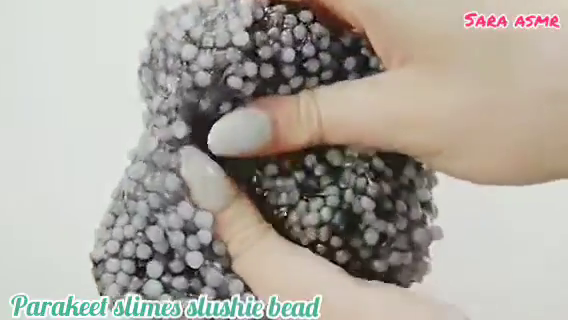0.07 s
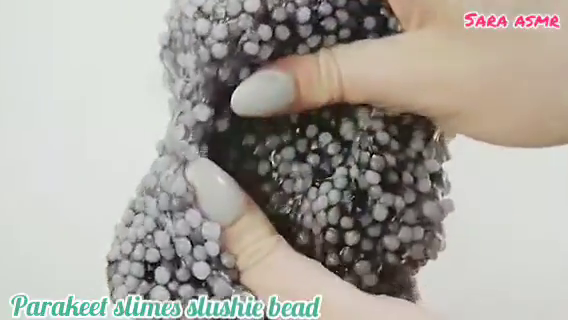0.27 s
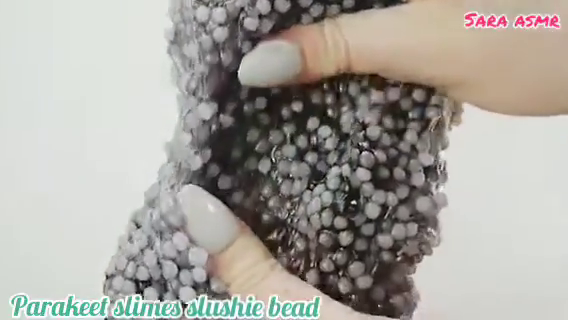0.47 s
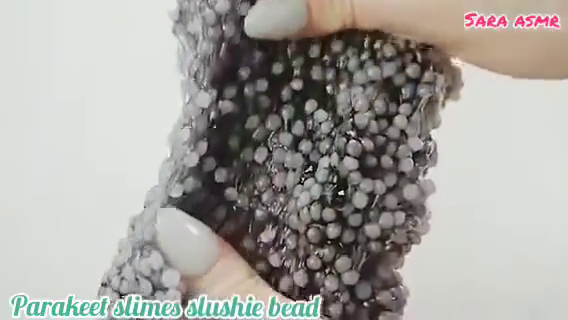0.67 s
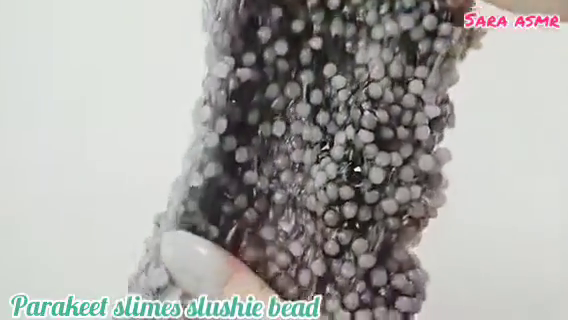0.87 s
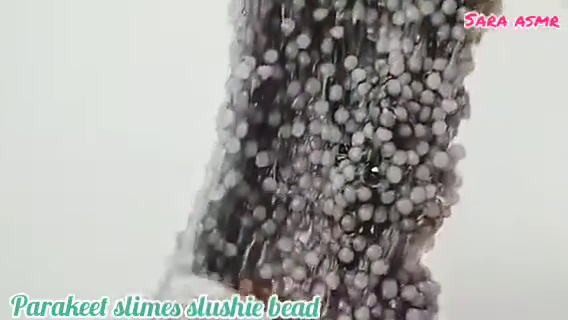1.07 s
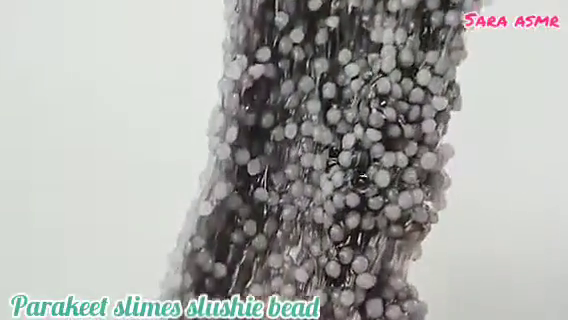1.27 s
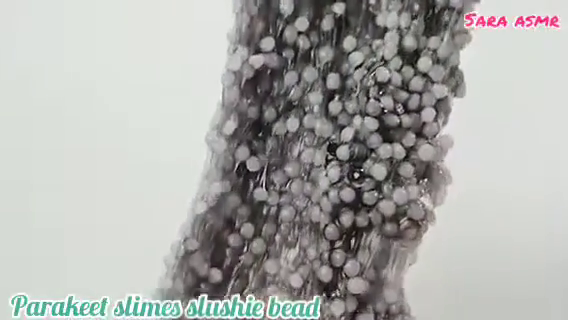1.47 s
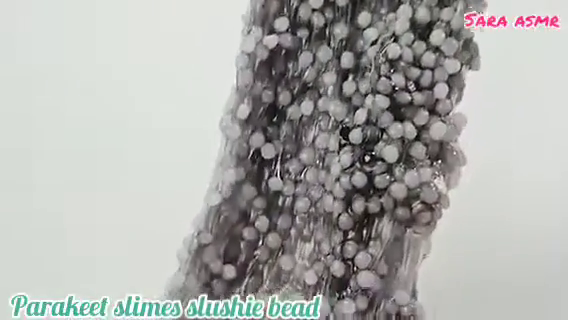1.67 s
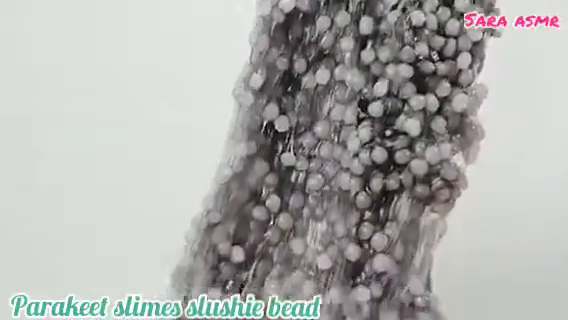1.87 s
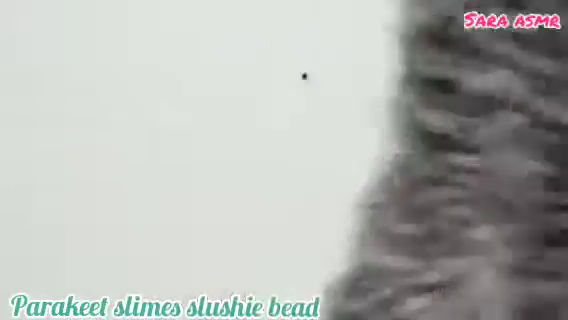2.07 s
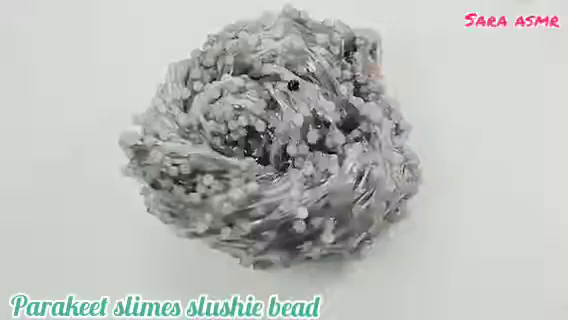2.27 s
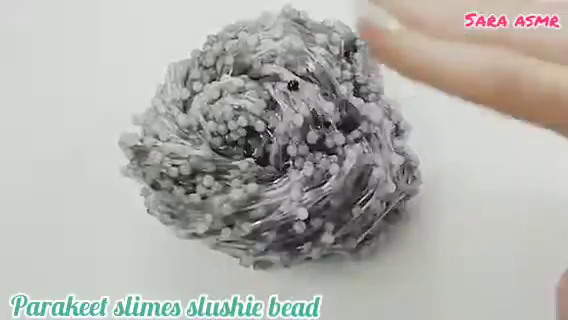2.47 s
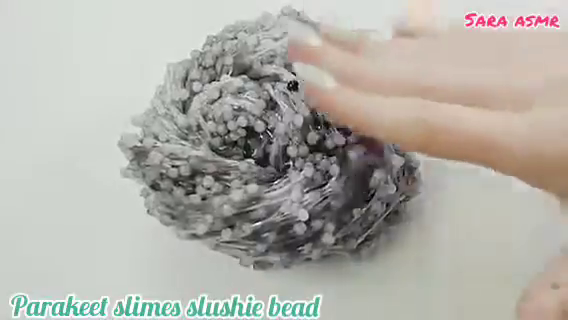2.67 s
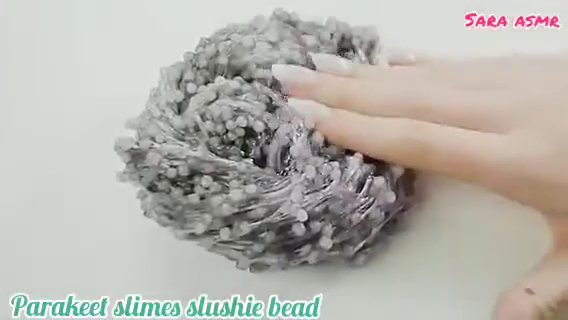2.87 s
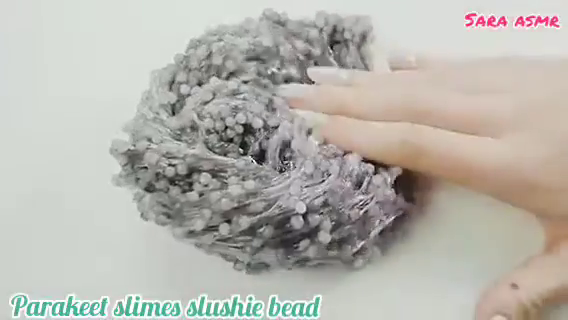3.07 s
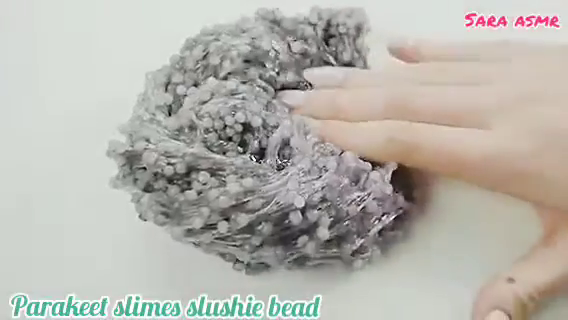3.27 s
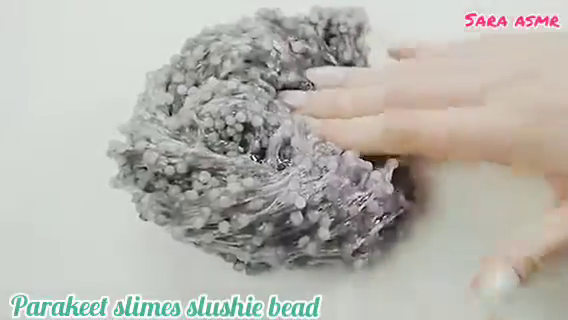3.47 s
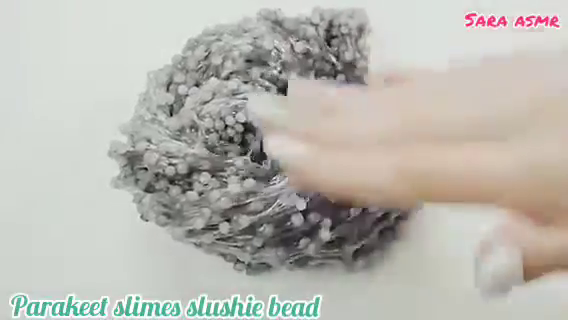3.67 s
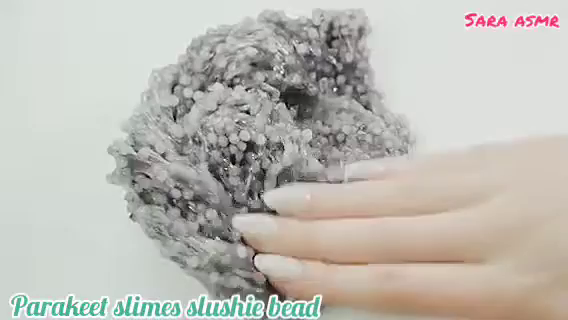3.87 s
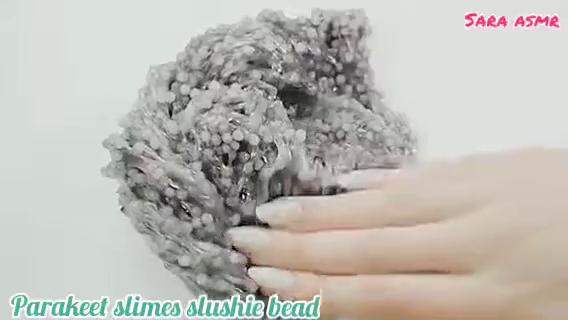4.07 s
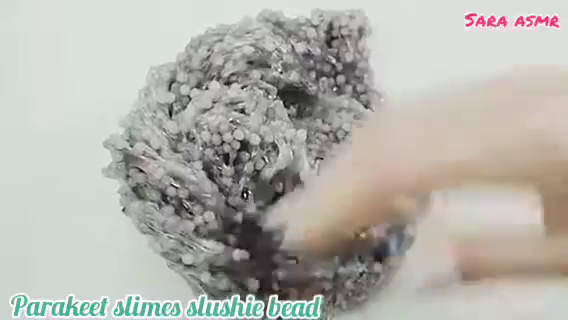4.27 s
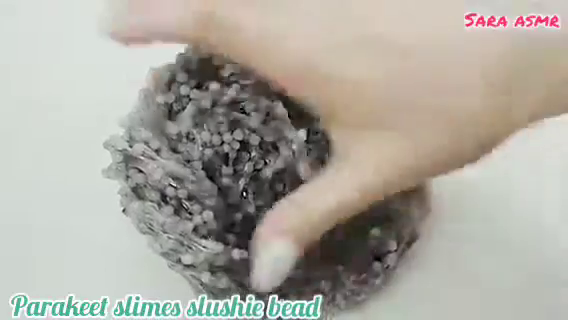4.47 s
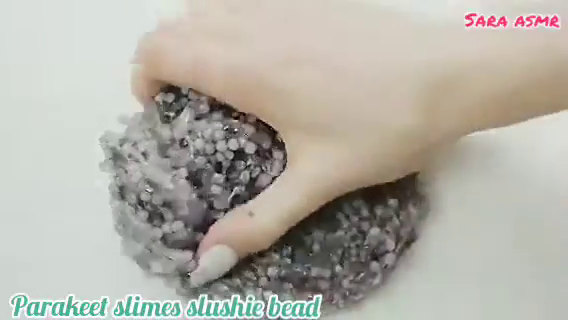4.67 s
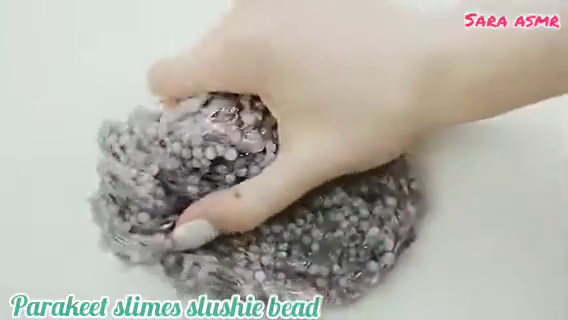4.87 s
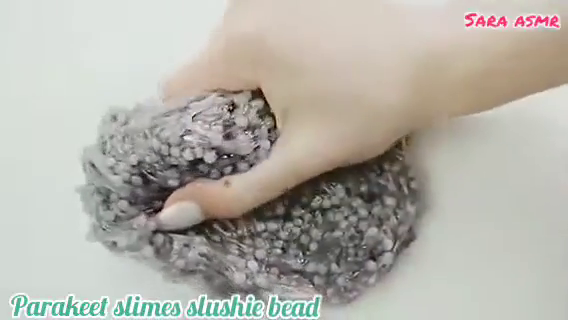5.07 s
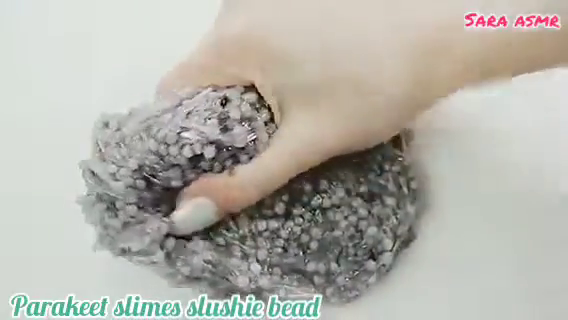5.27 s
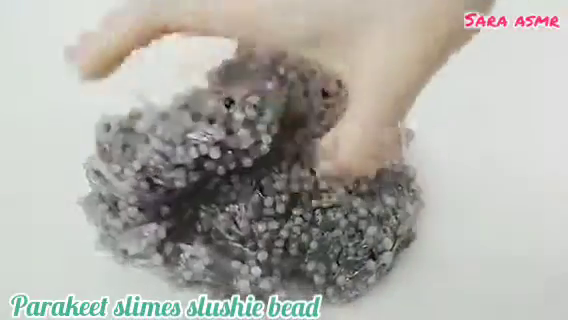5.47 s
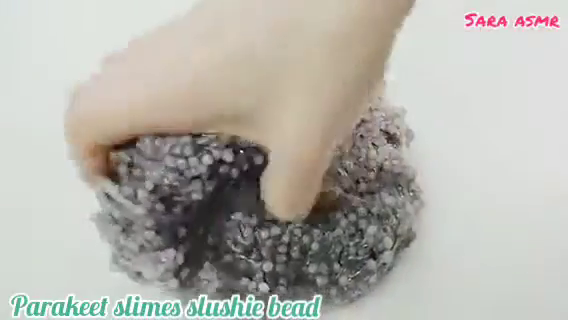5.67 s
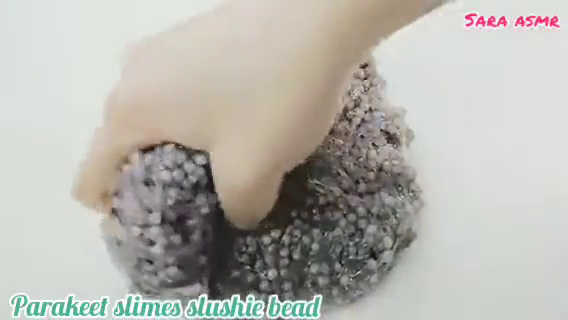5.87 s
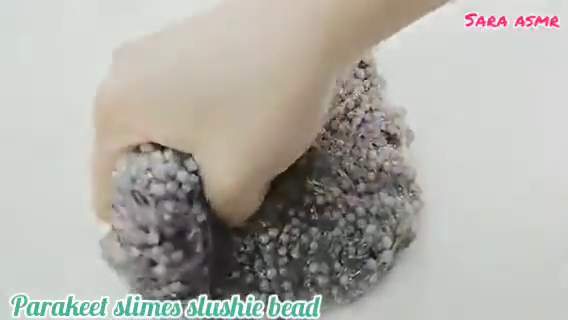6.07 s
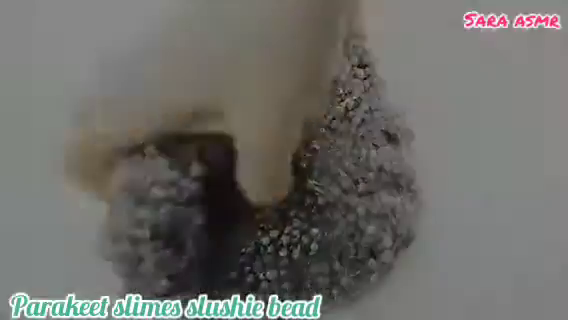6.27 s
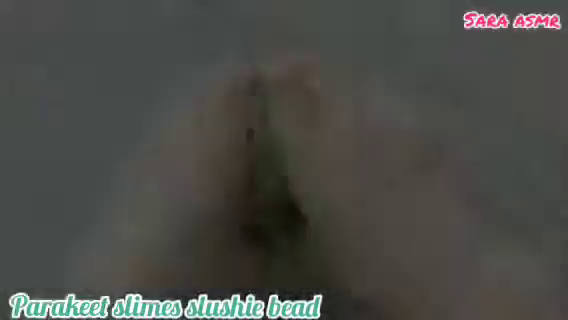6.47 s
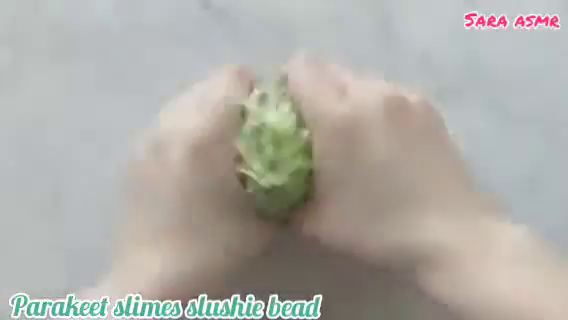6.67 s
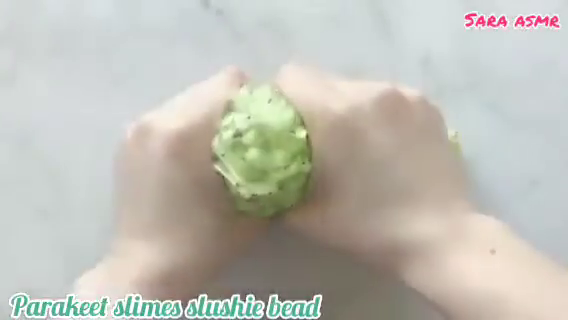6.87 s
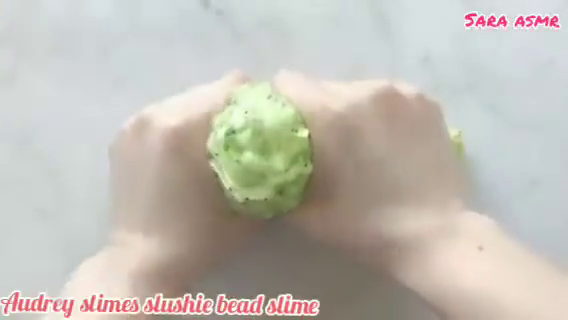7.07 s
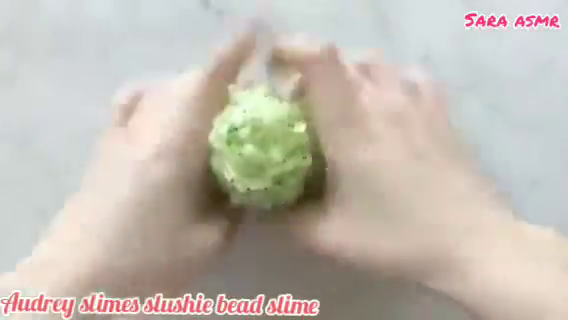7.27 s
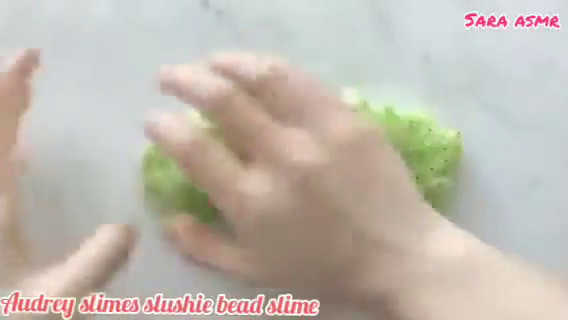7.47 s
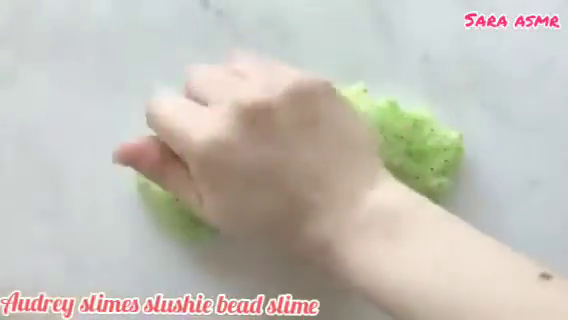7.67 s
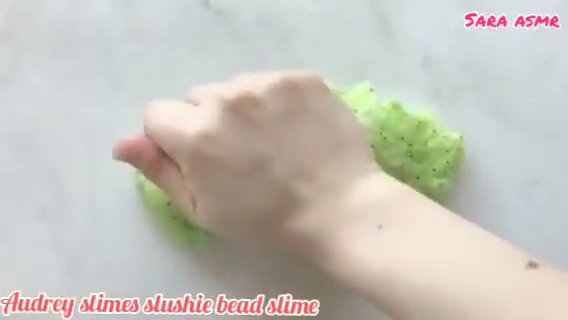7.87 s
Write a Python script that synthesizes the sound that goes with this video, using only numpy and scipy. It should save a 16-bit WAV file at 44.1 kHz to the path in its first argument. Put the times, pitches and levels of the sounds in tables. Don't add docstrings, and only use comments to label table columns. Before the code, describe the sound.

Close crackling of beady slime pulled, pressed, then crushed in fists, with snapping bubbles, low plops, a short silent gap and a late cross-fade.

```python
import sys
import numpy as np
from scipy import signal
from scipy.fft import rfft, irfft, next_fast_len
from scipy.io import wavfile
from scipy.ndimage import uniform_filter1d

SR = 44100
rng = np.random.default_rng(int(sys.argv[2]) if len(sys.argv) > 2 else 0)


def int16_out(signal):
    q = np.round(np.clip(np.atleast_2d(signal).T, -1, 1) * 32767)
    wavfile.write(sys.argv[1], SR, q.astype(np.int16))


def gain_from_decibels(decibels):
    exponent = np.asarray(decibels, float) / 20
    return 10 ** exponent


N = 349272
MONO_FROM_S = 6.42


def evened(x):
    return x / np.sqrt(np.mean(x ** 2) + 1e-20)


def read(points, hz):
    f, value = np.transpose(points)
    return np.interp(np.log(hz + 1), np.log(f + 1), value)


def coloured(x, points):
    count = next_fast_len(x.shape[-1], real=True)
    gain = gain_from_decibels(read(points, np.fft.rfftfreq(count, 1 / SR)))
    return irfft(rfft(x, count) * gain, count)[..., :x.shape[-1]]


def drift(count, smooth):
    return evened(uniform_filter1d(uniform_filter1d(rng.standard_normal(count), smooth), smooth))


def ring(t, hz, cycles):
    return np.sin(2 * np.pi * hz * t) * np.exp(-t * hz / cycles) * (1 - np.exp(-t * hz * 6))


def add(mix, s, sound):
    part = mix[max(round(s * SR), 0):][:len(sound)]
    part += sound[:len(part)]


# from t/s, to t/s, fade in/s, fade out/s
SCENES = [
    (-1, 2.25, .04, .045),
    (2.466, 6.42, .036, .6),
    (6.42, 9, .6, .04),
]
CUT_STEEPNESS = 2.5


def fader(t):
    gain = 0
    for start, end, rise_s, fall_s in SCENES:
        rise = np.clip((t - start) / rise_s, 0, 1) ** (1 if rise_s > .2 else CUT_STEEPNESS)
        fall = np.clip((end - t) / fall_s, 0, 1) ** (1 if fall_s > .2 else CUT_STEEPNESS)
        gain = gain + rise * fall
    return gain


ROOM_DB = (-59, -60.5, -55.5)
# f/Hz, level/dB per Hz
ROOM_COLOUR = [(15, -69), (25, -17.5), (120, -6), (190, -9.5), (285, -6.5), (659, -19), (14800, -39),
               (16000, -60)]


def room():
    t = np.arange(N) / SR
    mid, side = evened(coloured(rng.standard_normal((2, N)), ROOM_COLOUR))
    side = coloured(side, [(50, -13.5), (120, 0.5)]) * (t < MONO_FROM_S)
    scene_db = sum(db * ((t >= start) & (t < end)) for (start, end, _, _), db in zip(SCENES, ROOM_DB))
    level = gain_from_decibels(scene_db + .8 * drift(N, smooth=3000))
    return level * np.array([mid + side, mid - side])


# from t/s, to t/s, level/dB, f/Hz
DRONES = [
    (-0.15, 0.93, -55.5, 245.6),
    (1.802, 2.62, -52, 282),
    (5.2, 5.9, -52, 278),
    (5.44, 5.58, -54.5, 125),
]
# from t/s, to t/s, level/dB, f/Hz
BUMPS = [
    (5.65, 5.72, -51, 66),
    (5.655, 5.76, -52, 183),
    (4.612, 4.67, -50, 150),
]


def drone():
    out = np.zeros(N)
    for start, end, db, hz in DRONES + BUMPS:
        done = np.arange(0, 1, 1 / ((end - start) * SR))
        shape = [(.55 * hz, -30), (hz, 0), (1.6 * hz, -10), (4 * hz, -26), (12 * hz, -65)]
        band = evened(coloured(rng.standard_normal(SR + SR // 4), shape))[:len(done)]
        swell = gain_from_decibels(db + 2.5 * drift(len(done), smooth=1500)) * np.sin(np.pi * done ** .5)
        add(out, start, swell * band)
    return out


# peak t/s, grip level/dB, hold/s, fall/(dB/s)
PEELS = [
    (3.563, -30.5, 0.00345, 335.5),
    (4.303, -31.5, 0.0062, 299.5),
    (5.372, -31, 0.0786, 257),
    (6.33, -26.5, .004, 193.5),
    (7.255, -27.5, 0.0883, 499.5),
]


def peel_share(t):
    spans = sum((t > s - .08) & (t < s + hold_s + 30 / fall) for s, _, hold_s, fall in PEELS)
    return uniform_filter1d(spans * 1., size=900)


def gesture(t, start, length, first_db, last_db, rise, fall):
    done = np.clip((t - start) / length, 0, 1)
    edges = rise * np.maximum(start - t, 0) + fall * np.maximum(t - start - length, 0)
    return first_db + (last_db - first_db) * done - edges, done


# start t/s, length/s, grip level/dB at start, at end
PUSHES = [
    [(0, 2, -46.5, -46), (0, .28, -36, -44.5), (.31, 0.1708, -41.5, -36), (.67, 1.25, -41.5, -53.5),
     (1.05, 0.36, -42.5, -42.5), (1.57, 0.114, -44.5, -36), (1.72, 0.2567, -42.5, -37.5),
     (2.0, 0.17, -61.5, -48), (2.11, 0.0854, -47.5, -38)],
    [(2.79, 0.165, -40.5, -55.5), (2.91, 0.0886, -39, -35.5), (3.02, 0.156, -39.5, -39.5),
     (3.165, 0.0718, -39, -39.5), (3.28, 0.125, -34, -56), (3.385, 0.0297, -40.5, -44),
     (3.765, 0.1124, -48.5, -30.5), (3.88, 0.257, -33, -45.5), (3.98, 0.074, -37, -32),
     (4.1, 0.084, -38.5, -36), (4.612, 0.1558, -30.5, -23.5), (4.79, 0.1028, -25, -23.5),
     (4.92, 0.0147, -24.5, -20), (4.95, 0.0616, -33, -24.5), (5.07, 0.0948, -35.5, -25.5),
     (5.63, 0.043, -56.5, -42.5), (5.663, 0.122, -32, -25), (5.84, 0.219, -24.5, -26),
     (6.04, 0.1456, -29, -34.5)],
    [(6.43, 0.1853, -50.5, -22), (6.63, 0.441, -16, -31.5), (7.02, 0.1806, -28, -45.5),
     (7.58, 0.1693, -45.5, -21), (7.75, 0.11, -26, -27)],
]
# squelch under grip level/dB at start, at end,
# brightness/(dB/octave) at start, at end, lingering seep level/dB
DRYING = [
    (-13.5, -39.5, -0.92, -1.7, -35),
    (-11, -19.5, -1.5, -0.41, -33),
    (-14, -9.5, -1, 0.3, -55),
]
GRAB_DB_PER_S, LET_GO_DB_PER_S, LINGER_DB_PER_S = 7000, 223, 22
REST_DB, REST_BRIGHT = -88.5, 1
PEEL_RISE_DB_PER_S, PEEL_WET_DB, PEEL_BRIGHT = 261, 2.5, (-1, -1.11, -2.2)


def hands(t, k):
    wet_db, dry_db, dull, bright, linger_db = DRYING[k]
    rows = []
    for row in PUSHES[k]:
        db, done = gesture(t, *row, GRAB_DB_PER_S, LET_GO_DB_PER_S)
        rows.append((db, dull + (bright - dull) * done, db + wet_db + (dry_db - wet_db) * done))
    for s, peak_db, hold_s, fall in PEELS:
        db, _ = gesture(t, s, max(hold_s, 1 / SR), peak_db, peak_db, PEEL_RISE_DB_PER_S, fall)
        rows.append((db, PEEL_BRIGHT[k] + 0 * t, db + PEEL_WET_DB))
    fading = LINGER_DB_PER_S * t
    held_db = np.maximum.accumulate(np.max(rows, 0)[0] + fading) - fading
    seep_db = np.maximum(held_db + linger_db, REST_DB)
    rows = np.array(rows + [(seep_db, REST_BRIGHT + 0 * t, seep_db + wet_db)])
    return rows[rows[:, 0].argmax(0), :, np.arange(len(t))].T


def grains(count, per_s, spread_db, low_hz, high_hz, cycles, clump_db):
    clump = gain_from_decibels(clump_db * drift(count, smooth=120))
    size = gain_from_decibels(spread_db * np.minimum(rng.exponential(1, count), 4))
    size = size * (rng.random(count) < per_s / SR) * clump * rng.choice([-1., 1.], count)
    kind, t = rng.integers(0, 12, count), np.arange(512) / SR
    out = 0
    for k, hz in enumerate(np.geomspace(low_hz, high_hz, num=12)):
        out = out + signal.oaconvolve(size * (kind == k), evened(ring(t, hz, cycles)))[:count]
    return evened(out)


def tears(count, per_s, decay_s):
    size = gain_from_decibels(1.6 * np.minimum(rng.exponential(1, count), 3))
    starts = (rng.random(count) < per_s / SR) * size
    return .8 + signal.lfilter([1], [1, -np.exp(-1 / (decay_s * SR))], starts)


TICKS_DB = (-1.5, -2, -3)


def crackle(t, ticks_db):
    peeling = peel_share(t)
    ticks = coloured(grains(len(t), 1700, 2.2, 1000, 14000, 1.2, 1.5), [(500, -8), (15000, 4)])
    bursts = evened(tears(len(t), 360, .0028))
    fizz = rng.standard_normal(len(t)) * (peeling + (1 - peeling) * bursts)
    return gain_from_decibels(ticks_db - 6 * peeling) * evened(ticks) + fizz


def tilted(x, t, brightness):
    hz, s, z = signal.stft(x, SR, nperseg=128)
    lean = np.log2((hz[:, None] + 300) / 4000) * np.interp(s, t - t[0], brightness)
    patches = uniform_filter1d(rng.standard_normal(z.shape), size=2, axis=0)
    patches = evened(uniform_filter1d(patches, size=20, axis=1))
    return signal.istft(z * gain_from_decibels(lean + 2.6 * patches), SR, nperseg=128)[1][:len(x)]


# f/Hz, level/dB per Hz
SLIME = [
    [(290, -34.5), (500, -4), (765, -7), (1550, -2.5), (2550, 0), (7710, 0.5), (9950, 3.5), (14800, -6)],
    [(290, -24), (500, -3.5), (881, -6.5), (2660, -1.5), (6880, -2.5), (10500, -4), (14800, -12.5)],
    [(290, -17.5), (500, -9), (1530, -4.5), (3590, -4), (4310, -6.5), (7290, -4.5), (9810, -6),
     (14800, -7.5)],
]
SQUELCH_LAG_S = 0.0058


def kneading(t, k):
    coarse = t[::64]
    grip_db, brightness, squelch_db = (np.interp(t, coarse, c) for c in hands(coarse, k))
    keep = np.exp(-1 / (SQUELCH_LAG_S * SR))
    late = signal.lfilter([1 - keep], [1, -keep], gain_from_decibels(squelch_db))
    swell = np.minimum(late, gain_from_decibels(squelch_db))
    top = tilted(evened(coloured(crackle(t, TICKS_DB[k]), SLIME[k])), t, brightness)
    bubbles = (1 - peel_share(t)) * grains(len(t), 700, 3.85, 266.2, 900, 0.987, 2.5)
    wet = bubbles + gain_from_decibels(2.0) * rng.standard_normal(len(t))
    squelch = coloured(wet, [(35, -26.5), (100, -5.0), (250, -3.0), (420, 0), (800, -11.5),
                             (1500, -11.5), (4000, -48.5)])
    return fader(t) * (gain_from_decibels(grip_db - 3.0) * top + gain_from_decibels(-4.5) * swell * evened(squelch))


LEAD_S = .006


def pop(db, hz, spray_db, luck, noise):
    t = np.arange(len(noise)) / SR - LEAD_S
    after = np.maximum(t, 0)
    snap = noise * np.exp(-abs(t) / .00035)
    since = np.maximum(t + .5 / hz, 0)
    tone = ring(since / (1 + .12 * since * hz) ** .5 * 1.1, hz, .6 + 1.1 * luck)
    r = np.exp(-np.pi * .24 * hz / SR)
    poles = [1, -2 * r * np.cos(2 * np.pi * hz / SR), r * r]
    whistle = evened(signal.lfilter([1, 0, -1], poles, noise[::-1]))
    spray = np.where(t < 0, .45 * np.exp(t / .0012), np.exp(-after / .0027))
    settle = .2 * np.exp(-after / .016) * (t > 0)
    air = (spray + settle) * (gain_from_decibels(-5.5) * noise[::-1] + gain_from_decibels(-6) * whistle)
    return gain_from_decibels(db) * (gain_from_decibels(-16.0) * snap + gain_from_decibels(2.5) * tone + gain_from_decibels(spray_db - 4.5) * air)


# t/s, peak level/dB, ring f/Hz, spray level/dB
PULL_POPS = [(.0065, -25.5, 10000, -1.5), (0.0904, -19, 4720, -3.5), (0.0953, -15.5, 5180, -5),
             (0.1472, -20, 3440, -2), (0.157, -20, 5120, -3.5), (0.2435, -24.5, 4570, -5),
             (0.3114, -6.5, 10180, -11), (0.3556, -25, 5150, -0.5), (0.3851, -23, 10770, 2.5),
             (0.4201, -23, 9500, 6), (0.4284, -15.5, 1790, -25.5), (0.4313, -11, 9400, -1),
             (0.5093, -24, 10400, -10), (0.5664, -21, 9860, -8), (0.6366, -26.5, 10250, -3.5),
             (0.6852, -10, 10100, -15.5), (0.7187, -25.5, 5400, -3), (0.7559, -23, 2370, -1),
             (0.8797, -23, 2330, -10), (1.1247, -17.5, 12380, -12), (1.192, -7.5, 5330, -15.5),
             (1.2599, -23.5, 2650, -0.5), (1.2779, -19, 10600, -7.5), (1.4023, -26.5, 3070, 2.5),
             (1.4131, -19, 12730, -4), (1.5823, -25, 9600, 4.5), (1.6271, -18.5, 10400, -5.5),
             (1.668, -17, 3140, -0.5), (1.6715, -16, 7280, 0.5), (1.8185, -20.5, 9650, -7.5),
             (1.9642, -29.5, 3000, 7.5), (2.161, -28.5, 7500, -4.5),
             (0.0356, -18.5, 3370, -13), (0.0786, -27.5, 2650, -8), (0.1672, -24, 2570, -5),
              (0.169, -22.5, 9930, -12.5), (0.31, -18, 3510, -8.5), (0.3841, -26, 2580, -4),
              (0.42, -30, 9430, -12), (0.5089, -21.5, 10700, -3.5), (0.636, -29, 2580, -15),
              (0.675, -25.5, 10770, -4.5), (0.692, -28.5, 2170, -11), (0.818, -30, 4650, -4),
              (0.919, -31, 3810, -12.5), (0.918, -29, 9850, -4), (0.9598, -37, 2330, -12.5),
              (0.9757, -42, 9540, -12), (1.0467, -36, 4670, -8.5), (1.0469, -33.5, 2040, -6.5),
              (1.0684, -31.5, 10080, -12), (1.1724, -30, 11330, -9), (1.24, -23.5, 10100, -13.5),
              (1.257, -23.5, 10100, -6.5), (1.339, -27.5, 2690, -1.5), (1.097, -28, 9500, -2),
              (.859, -26, 9000, -7.5), (1.4493, -27.5, 10250, -11.5), (1.5813, -20.5, 9650, -14.5),
              (1.646, -35, 2270, 4.5), (1.721, -21, 9970, -8), (1.747, -26, 9110, -4.5),
              (1.8866, -15.5, 10640, -22), (1.9215, -23, 9990, -9), (2.0145, -29, 7060, -8),
              (2.075, -35.5, 8700, -5), (2.193, -21.5, 7280, -8.5), (2.2073, -30, 2540, -19.5)]
PRESS_KNEAD_POPS = [(2.677, -42.5, 2250, 2), (2.7909, -12, 2240, -15.5), (2.8717, -29, 2930, -9.5),
                    (2.913, -16, 10600, -15), (2.9379, -15, 2080, -8.5), (2.986, -19, 8300, -6),
                    (2.9941, -17, 2094, -2), (3.1292, -16.5, 1745, -12.5), (3.168, -19, 5650, -4),
                    (3.1977, -24, 3800, 2.5), (3.2278, -23, 1670, -9), (3.3461, -23.5, 1580, -6),
                    (3.3795, -18.5, 7220, -1.5), (3.3841, -19, 7260, -18.5), (3.864, -18, 2690, -20.5),
                    (3.8865, -16, 1380, -21), (3.895, -12.5, 4010, -14.5), (3.988, -20, 11500, -6),
                    (4.008, -14, 2240, -9), (4.052, -12.5, 10680, -38), (4.1344, -19, 2900, -22),
                    (4.1853, -10.5, 2790, -19.5),
                    (4.6345, -24.5, 2540, -7.5), (4.698, -19, 1050, -14.5), (4.96, -11.5, 5500, 2.5),
              (4.6689, -11.5, 2480, -2), (4.718, -8.5, 2660, -5), (4.728, -5, 6400, -16),
              (4.733, -16, 2510, -10.5), (4.7606, -15.5, 2580, -4.5), (4.824, -19.5, 1650, 2.5),
              (4.8808, -9, 2330, -9.5), (4.941, -8, 3670, -0.5), (4.9927, -12.5, 9100, 0.5),
              (4.9945, -24.5, 1170, 6.5), (5.1757, -21, 2040, 6.5), (5.263, -31, 4630, 1.5),
              (5.6553, -19.5, 5650, 4), (5.659, -17.5, 1253, -8), (5.6884, -14, 2650, -15.5),
              (5.7188, -8.5, 2646, -20.5), (5.768, -13, 2630, -13), (5.773, -12.5, 1620, 1),
              (5.789, -6, 12100, -16), (5.8349, -19.5, 2730, 0.5), (5.8468, -19.5, 1680, -2.5),
              (5.868, -13, 2800, -8), (5.9591, -17, 2720, 3), (5.9884, -12.5, 2480, -11.5),
              (6.0241, -12, 3020, 2.5), (6.0277, -8, 4270, -3), (6.034, -8.5, 6870, -5.5),
              (6.204, -28.5, 2630, -8),
                    (2.826, -34, 2370, -8), (2.8847, -29.5, 3040, -9), (2.8973, -34.5, 3080, -6),
               (3.0449, -25, 1510, -13.5), (3.0638, -29.5, 4630, -5.5), (3.0659, -21, 2650, -5),
               (3.091, -22, 1940, -4.5), (3.18, -23, 3700, 0), (3.2766, -17.5, 2290, -2.5),
               (3.2875, -23, 2110, -0.5), (3.38, -21.5, 2700, -4), (3.5153, -34, 6630, -16.5),
               (3.64, -45, 6140, -9), (3.7578, -54, 2410, 4), (3.7601, -34.5, 6050, -5),
               (3.9414, -21, 5900, -9.5), (4.011, -21.5, 8790, -8.5), (4.0452, -18.5, 5500, -5),
               (4.08, -22, 2580, -9.5), (4.096, -27.5, 1490, -8.5), (4.1335, -21.5, 4670, -7.5),
               (4.1607, -25.5, 4650, -9), (4.1611, -20.5, 1630, -7), (4.3921, -45, 5190, -9.5),
               (4.4334, -49, 4220, -9), (4.6141, -21, 5540, -3), (4.65, -11, 2420, -4),
               (4.773, -12, 2740, -6.5), (4.926, -15.5, 10060, -6.5), (4.9359, -9.5, 6640, -8),
               (4.9922, -22, 2730, 1.5), (5.08, -13, 10440, -7.5), (5.156, -12.5, 10570, -5),
               (5.2442, -34, 6400, -7.5), (5.7414, -13, 2430, -17), (5.835, -19.5, 5230, -16),
               (5.8359, -16.5, 1500, -18), (5.8637, -13, 5660, -12), (5.909, -13, 1664, -10),
               (5.9457, -14, 8680, -4), (5.954, -13.5, 1750, -7.5), (5.955, -16.5, 4520, -4.5),
               (6.1119, -25, 7240, -10.5), (6.1106, -34.5, 2910, -9.5), (6.131, -26, 10080, -2.5),
               (6.192, -30.5, 1590, -17.5), (6.3081, -35.5, 10270, -9)]
SQUEEZE_CRUSH_POPS = [(6.4479, -39.5, 5710, -14.5), (6.498, -38, 2520, -1.5), (6.54, -32, 2060, 5.5),
                      (6.6403, -6.5, 2350, -24.5), (6.6501, -2, 9140, -29.5), (6.68, -18, 1510, 0.5),
                      (6.7445, -13, 11620, -11), (6.7532, -11, 3600, -0.5), (6.7562, 0.5, 6350, -21.5),
                      (6.7986, 0, 8100, -10), (6.827, -14, 1180, 0), (6.8591, 7.5, 6600, -11),
                      (6.894, -2.5, 8100, -5), (6.897, 12, 13200, -19), (6.9265, -2.5, 11400, -11),
                      (6.9492, -20, 2960, 11), (6.994, -16.5, 14400, 4), (7.0504, -1, 11900, -9),
                      (7.054, -7, 13500, -11), (7.076, -10.5, 3720, -10), (7.0792, -16.5, 5660, 1.5),
                      (7.098, -25, 1500, -2),
                      (7.478, -52, 6970, -6), (7.773, -10.5, 4300, -6), (7.6828, 1.5, 10840, -10),
              (7.7032, -14.5, 1420, 5), (7.7282, -6.5, 1280, 0.5), (7.7449, -0.5, 8060, -2.5),
              (7.748, -9.5, 8350, -1), (7.7821, 2, 5540, -1), (7.787, -12.5, 5940, -5.5),
              (7.819, -21, 2820, -12), (7.8246, -17, 10360, 8), (7.827, -1, 7240, -8),
              (7.852, -0.5, 12100, -10), (7.8916, -6.5, 3435, 4),
                      (6.4743, -42, 9000, -12.5), (6.51, -35.5, 5320, -11.5), (6.523, -33, 1250, 1),
                 (6.5383, -34, 1080, 3.5), (6.558, -28.5, 1400, -1.5), (6.558, -21, 5070, -9.5),
                 (6.6474, -9.5, 2380, -15), (6.6673, -16, 7770, -16), (6.7104, -8, 8400, -10.5),
                 (6.764, 1.5, 7140, -6.5), (6.8577, 3.5, 3624, -12.5), (6.877, -9.5, 12640, -12),
                 (6.9088, -20, 1810, -6), (6.949, 3, 13450, -7), (7.038, -8.5, 12380, -7.5),
                 (7.107, -18, 9000, -1.5), (7.1503, -20, 4540, -7.5), (7.539, -42, 6250, -5.5),
                 (7.5748, -19, 5540, -12.5), (7.5783, -24, 1503, -12), (7.5904, -31.5, 5920, -11.5),
                 (7.5906, -21, 3770, -16), (7.6075, -27.5, 12340, -14.5), (7.6374, -19.5, 10570, -6),
                 (7.7097, 3, 5490, -19.5), (7.8166, 1.5, 3450, -5), (7.8175, -10, 1130, -5)]


def popping(k):
    pops = (PULL_POPS,
            PRESS_KNEAD_POPS,
            SQUEEZE_CRUSH_POPS)[k]
    out, luck = np.zeros(N), rng.random(len(pops))
    noise = evened(coloured(rng.standard_normal((len(pops), 2048)), SLIME[k]))
    for (s, *row), chance, hiss in zip(pops, luck, noise):
        add(out, s - LEAD_S, pop(*row, chance, hiss))
    return out


# f/Hz, side minus mid level/dB
WIDTH = [
    [(60, -13.5), (380, 1), (2380, -7.5), (15000, -1.5)],
    [(60, -43), (380, -7), (2380, -9), (15000, -3.5)],
    [(4000, -7), (9000, -5), (15000, -5)],
]


def spread(x, k):
    hz, _, z = signal.stft(x, SR, nperseg=128)
    phase = np.exp(2j * np.pi * rng.random(z.shape))
    turned = z * phase * gain_from_decibels(read(WIDTH[k], hz) + 1.5)[:, None]
    return signal.istft(turned, SR, nperseg=128)[1][:N]


# t/s, peak level/dB, f/Hz
CAVITIES = [(.695, -34.5, 420), (1.195, -43, 422), (2.7925, -39.5, 800), (3.29, -33.5, 409),
            (4.634, -26.5, 408), (4.8277, -26.5, 489), (4.944, -24, 486), (4.9933, -19.5, 505),
            (5.17, -25, 490), (5.8488, -23.5, 451), (6.0262, -21.5, 467.5), (6.7092, -22.5, 470),
            (6.766, -27.5, 731), (6.8278, -20.5, 425.8), (7.7038, -18.5, 697), (7.7321, -12, 632),
            (7.7475, -18, 587), (7.785, -19, 419), (7.8195, -4.5, 473.6), (7.8934, -15, 679)]


def plops():
    out, t = np.zeros(N), np.arange(1500) / SR
    for s, db, hz in CAVITIES:
        turns = hz * (0.746 * t + 0.001098 * (1 - np.exp(-t / 0.00157)))
        envelope = np.exp(-t / 0.001493) * (1 - np.exp(-t / 0.000892))
        add(out, s - .002, gain_from_decibels(db + 5.0) * np.sin(2 * np.pi * turns) * envelope)
    return coloured(out, [(60, -28.5), (200, 3.0)])


# f/Hz, width/Hz, level/dB
POCKETS = [
    (1189.5, 141.5, 6),
    (1680, 130, 2.5),
    (2650, 210, 3),
]


def heap(x):
    hz = np.geomspace(500, 5000, num=200)
    boost_db = sum(db * np.exp(-((hz - f) / width) ** 2) for f, width, db in POCKETS)
    return coloured(x, np.transpose([hz, boost_db]))


HUM_HZ, HUM_DB, HUM_RISE_DB_PER_S = 69, -50, 2.5


def hum():
    t = np.arange(N) / SR
    turns = np.cumsum(HUM_HZ + 3.4 * drift(N, smooth=2500)) / SR
    level = gain_from_decibels(HUM_DB + HUM_RISE_DB_PER_S * (t - 7) + 2.5 * drift(N, smooth=2000))
    return level * np.clip((t - 6.42) / .1, 0, 1) * np.sqrt(2) * np.sin(2 * np.pi * turns)


# t/s, peak level/dB, f/Hz, length/s
SQUEAKS = [
    (7.44, -68, 4220, 0.059),
    (7.742, -9, 8400, 0.0074),
    (7.824, -5, 7258, 0.0085),
]


def squeaks():
    out = np.zeros(N)
    for s, db, hz, length_s in SQUEAKS:
        count = round(length_s * SR)
        turns = np.cumsum(hz * (1 + 0.0089 * drift(count, smooth=30))) / SR
        add(out, s, gain_from_decibels(db) * np.hanning(count) * np.sin(2 * np.pi * turns))
    return out


def scene():
    t = np.arange(N) / SR
    out = (room() + drone() + hum()) * fader(t) + plops() + squeaks()
    for k, (start, end, _, _) in enumerate(SCENES):
        mid = coloured(popping(k), [(80, -23), (400, -1.5)])
        during = t[(t >= start) & (t < end)]
        bed = kneading(during, k)
        add(mid, during[0], heap(bed) if k == 1 else bed)
        side = spread(mid, k)
        out += np.array([mid + side, mid - side])
    return out


def patchy_treble(x):
    hz, s, (mid, side) = signal.stft([x[0] + x[1], x[0] - x[1]], SR, nperseg=512)
    f, last = hz[:, None], s > MONO_FROM_S
    count = len(s) // 4 + 1
    power = (abs(mid[hz > 8000]) ** 2).sum(0) + 1e-20
    sudden = power > 4.5 * uniform_filter1d(power, size=9, origin=4)
    edge_hz = np.repeat(15150 - 240 * rng.exponential(1, count), repeats=16)[:len(s)]
    edge_hz = edge_hz + 4 * (10 * np.log10(power) + 40) + 400 * last
    band = np.where(f < edge_hz, 1, sudden * gain_from_decibels(-17) * (f < 16400))
    share = rng.choice([0, .35, .8, 1], count)
    blocks = np.kron(rng.random((33, count)) < share, np.ones((8, 4)))[:len(hz), :len(s)]
    kept = np.where(last, blocks * (f > 4200), np.maximum(blocks, f < 1800))
    mid, side = signal.istft([mid * band, side * band * kept], SR, nperseg=512)[1][:, :N] / 2
    return np.array([mid + side, mid - side])


def low_pass(x):
    return signal.sosfilt(signal.butter(12, 16490, fs=SR, output="sos"), x)


def record(dry):
    held = np.tanh(dry / .8) * .8
    mix = patchy_treble(held)
    return low_pass(mix)


dry = scene()
out = record(dry)
int16_out(out)
```